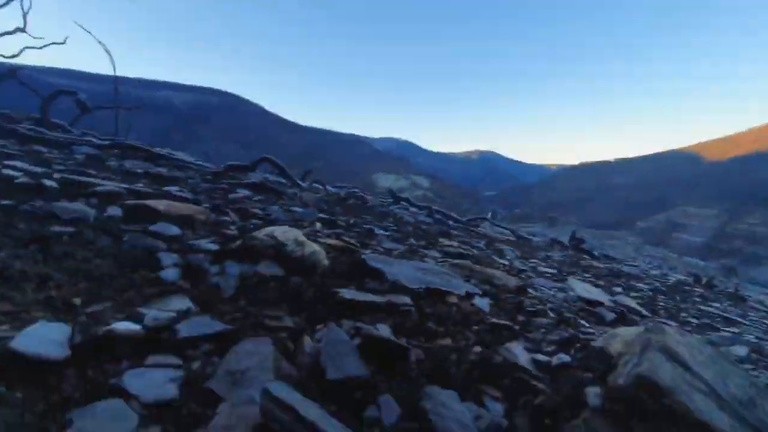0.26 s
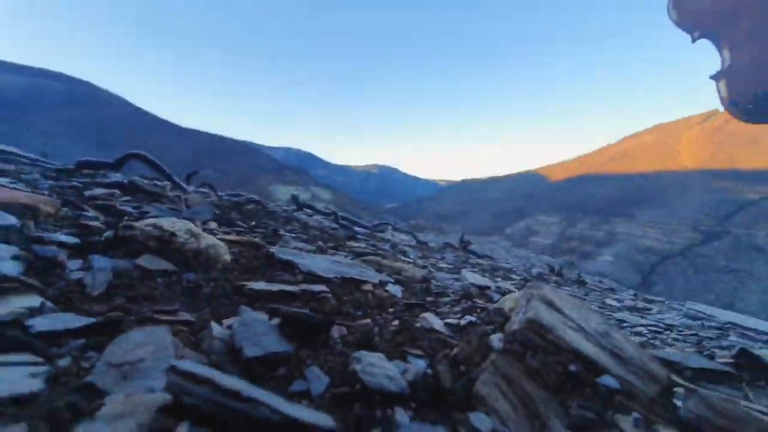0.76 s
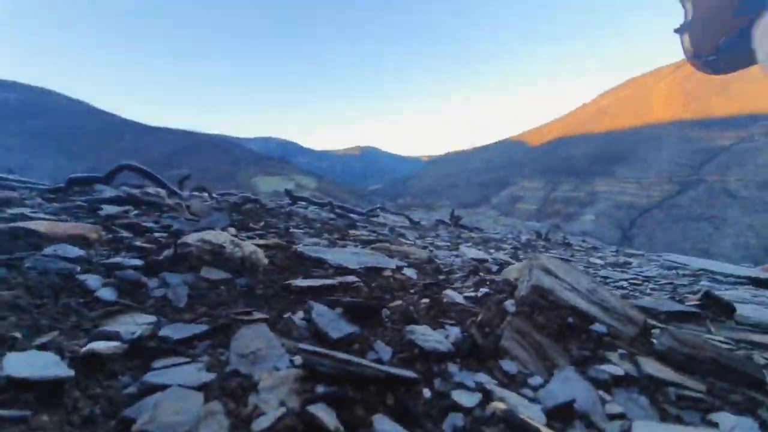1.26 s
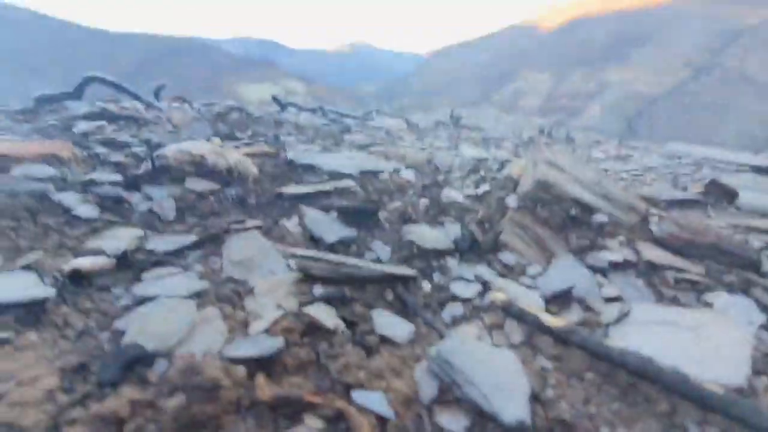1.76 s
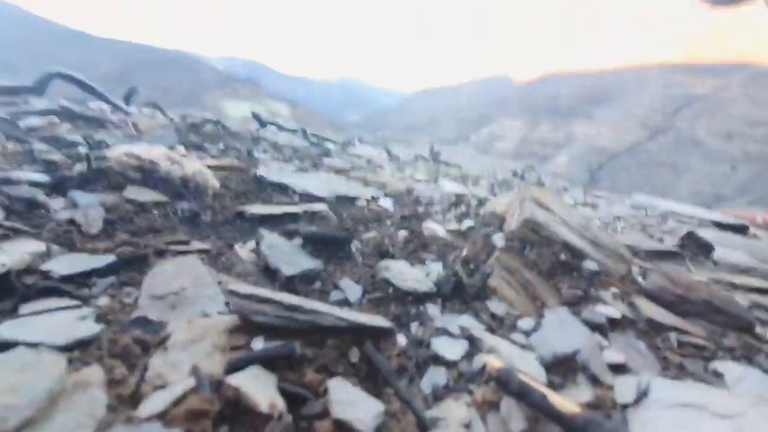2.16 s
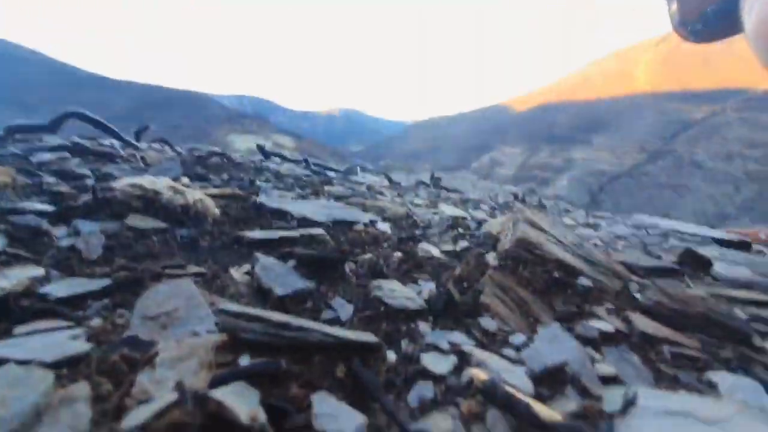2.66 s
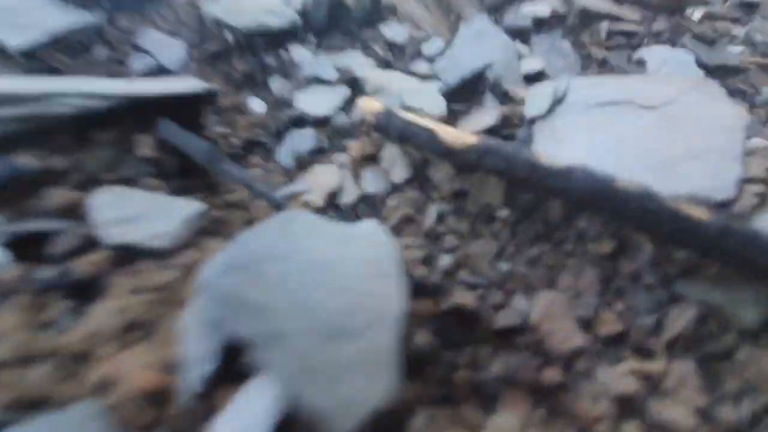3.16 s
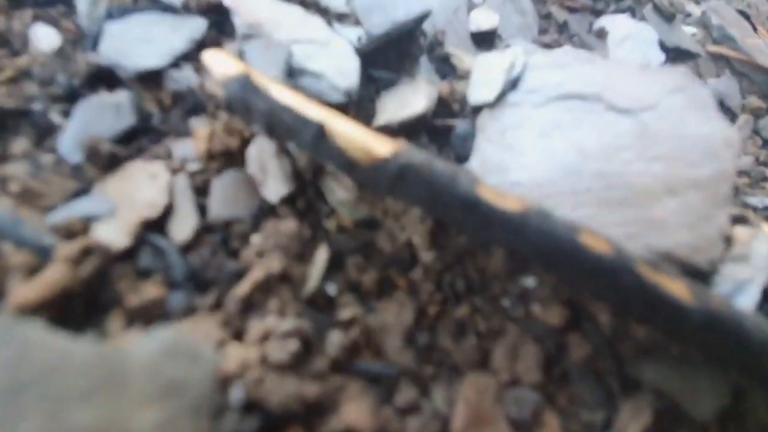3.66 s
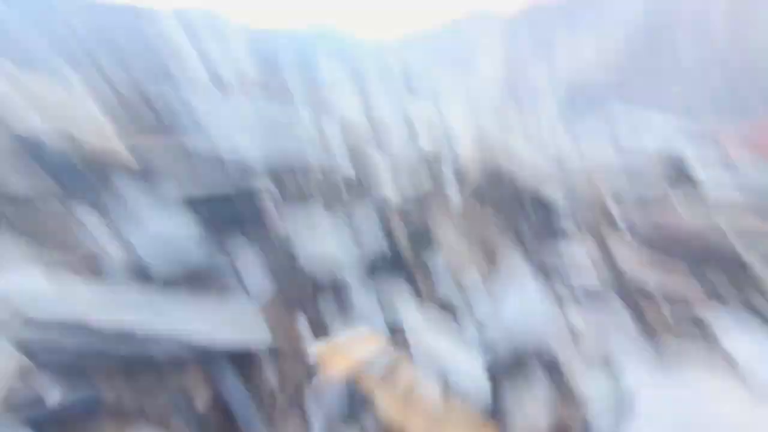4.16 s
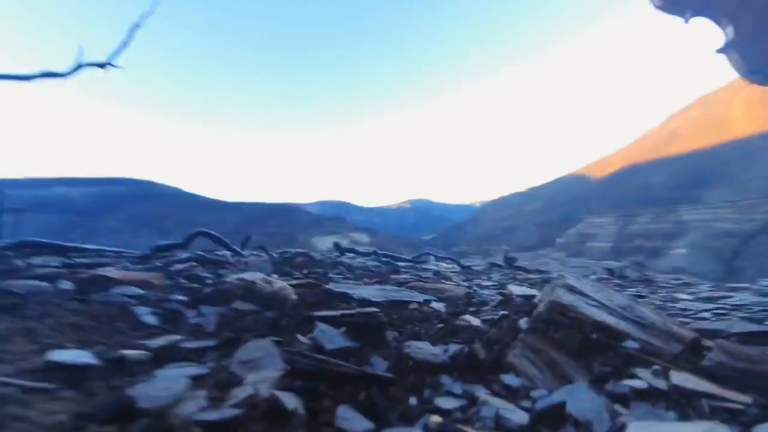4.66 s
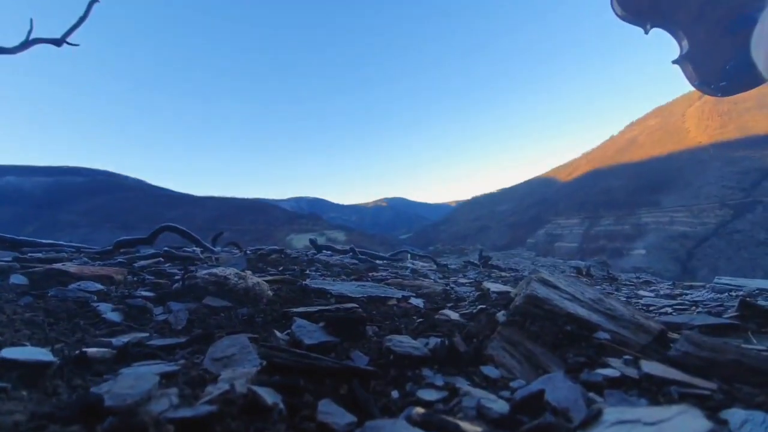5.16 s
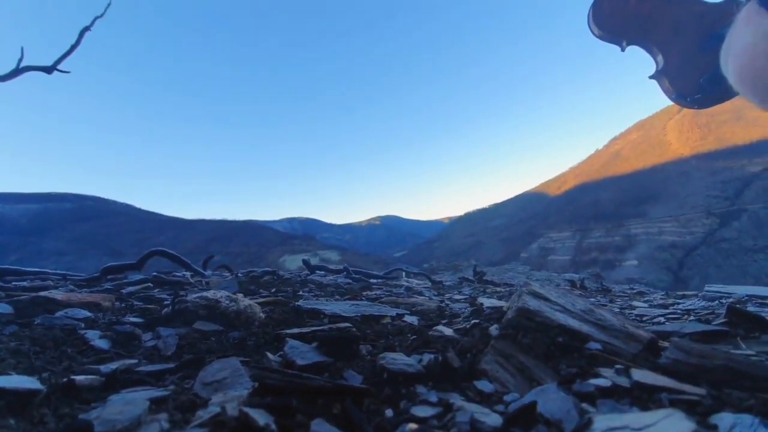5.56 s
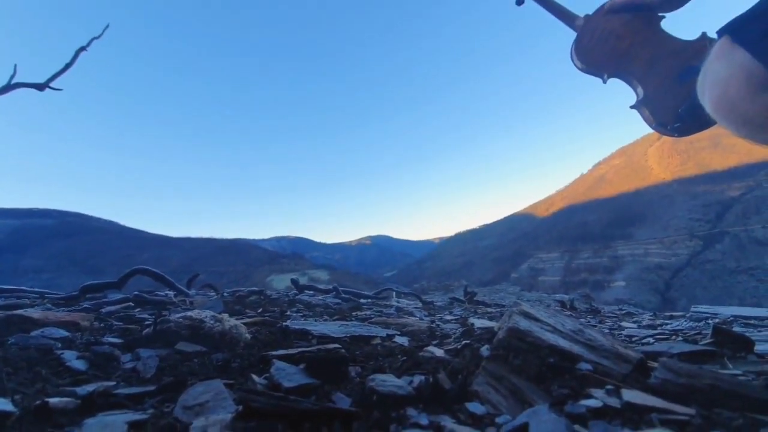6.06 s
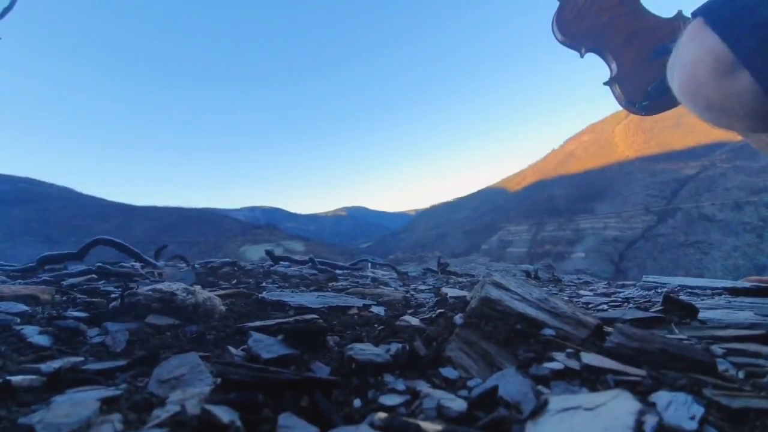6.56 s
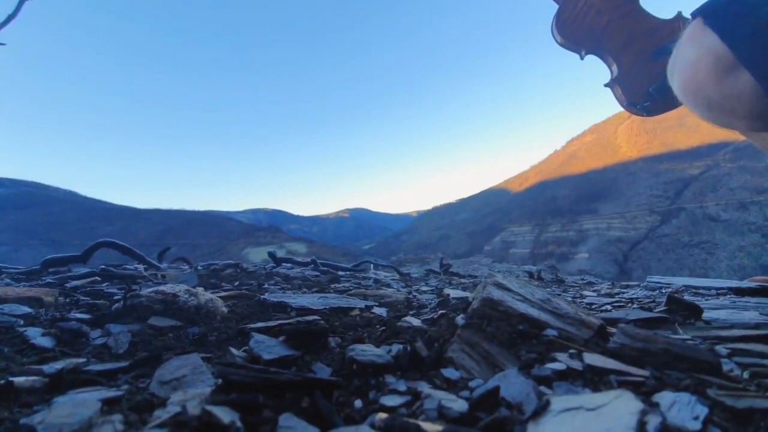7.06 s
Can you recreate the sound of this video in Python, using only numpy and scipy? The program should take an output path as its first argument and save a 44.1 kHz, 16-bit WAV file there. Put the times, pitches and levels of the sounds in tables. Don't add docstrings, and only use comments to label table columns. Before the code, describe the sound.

Quiet, low valley air and slight hiss run throughout, without echo. Fingers barely scuff the housing until a knock and deep thump at 0.5 s, with a creaking grip. Brief rubs follow at 0.85, a double-sided knock at 1.05, then slow scrapes, taps and small shard ticks to 1.6. From 2.0 to 2.2 a hard gritty jam ends in a loud bright crack and shell knock. Softer pushes and rasps lead to rubs and knocks at 3.0, then a sharp slate click and thump at 3.3. It eases near 3.9; scrapes and taps return at 4.2, with hard clicks and blows at 4.6 to 4.8. After sparse scuffs and a 5.4 bump, the hardest paired knocks hit at 5.9. A squeaky scrape and taps come at 6.35, a dull thump at 6.77, then faint scuffs and ticks fade away by 7.2. Left sounds brighter, right duller.

```python
import sys
import numpy as np
from scipy import signal
from scipy.fft import rfft, irfft, next_fast_len
from scipy.io import wavfile
from scipy.ndimage import uniform_filter1d

SR = 44100
rng = np.random.default_rng(int(sys.argv[2]) if len(sys.argv) > 2 else 0)


def boost(x):
    u = np.asarray(x, float) / 20
    return 10 ** u


def to_wav(sig):
    pcm = np.clip(np.atleast_2d(sig), -1, 1) * 32767
    pcm = np.round(pcm).astype(np.int16)
    wavfile.write(sys.argv[1], SR, pcm.T)


N = 322371
PORT_LAG_S = 0.00064
STEP = 32
LEAD = 64

# pitch_hz, level_db (per Hz)
AIR_COLOUR = [(15, -36), (25, -1), (80, -4), (470, -10.5), (1060, -23), (4480, -28), (4990, -33),
              (7110, -43.5), (8140, -37), (14800, -33), (16500, -46.5)]
# pitch_hz, likeness (0 to 1)
AIR_LIKENESS = [(330, 0.55), (1100, 0.0082)]

# pitch_hz, left_db, right_db (per Hz)
SCRAPE_COLOUR = [(475, -34.5, -27), (900, -14, -3.5), (1370, -9, -3.5), (1630, -8, 0.5), (2030, -2, 1.5),
                 (2726, -9, -7), (3350, -11, -7.5), (4200, -11, -10), (5400, -13, -24), (5730, -10.5, -18),
                 (6600, -18.5, -23.5), (8350, -50.5, -46)]
GRIT_COLOUR = [(5560, -30.5, -29.5), (7900, -2.5, -2.5), (8400, -2.6, -2), (11300, -7.5, 3.5),
               (13100, -11, -4), (15300, -17.5, -10), (15900, -21, -17), (16400, -57.5, -61.5)]
# start_s, left_db, right_db, grit_over_scrape_db
SCUFFS = [(0.14, -76, -63, -27), (0.527, -87, -66, 6), (1.115, -41, -45, -6), (1.605, -52, -53.5, -4.5),
          (1.822, -57.5, -74, -9), (2.485, -55, -65, -5), (3.22, -50, -45, -16.5), (3.385, -46, -46, -4.5),
          (3.47, -42.5, -42, -19), (3.55, -51.5, -46.5, -1), (3.87, -68, -65, -5), (1.686, -43, -40, -11.5),
          (1.876, -62, -66, -9), (1.99, -55, -48, -6), (2.02, -44, -44, -14), (2.298, -58, -69, -12),
          (2.568, -62, -52, -4.5), (2.93, -42, -39, -11.5), (3.59, -41.5, -35, -15),
          (3.696, -40.5, -46.5, -14.5), (3.789, -45, -37, -14.5), (4.64, -55, -52, -22),
          (5.087, -74, -71, -13), (5.41, -42, -35, -9.5), (5.625, -53, -42, -12),
          (5.709, -36.5, -35.5, -12.5), (5.368, -65, -78, 2), (6.786, -47.5, -42, -9),
          (7.06, -66, -59, -32), (7.186, -66, -60, -40.5)]
# start_s, length_s, left_db, right_db, grit_over_scrape_db
PUSHES = [
    (.66, 0.22, -40, -40.5, -19),
    (1.27, 0.3, -44, -39, -14),
    (2.38, 0.08, -53, -47, -10.5),
    (2.7, 0.14, -50.5, -54, -11),
    (2.97, 0.11, -41.5, -37.5, -15),
    (3.25, 0.05, -33.5, -40.5, -14),
    (3.97, 0.16, -57, -53.5, -7.5),
    (4.18, 0.084, -39, -41, -16.5),
    (6.25, 0.083, -51, -51, -12),
    (6.066, .022, -51, -59, -4),
]
JAMS = [
    (2.035, 0.11, -25, -33, -13),
    (4.722, 0.024, -38, -35.5, -14.5),
]
SLIDES = [(4.46, 0.16, -74, -59, -21), (4.86, 0.15, -63, -62, -7), (6.545, 0.049, -52.5, -49, -8),
          (6.87, 0.39, -82, -82.5, -19), (1.74, 0.15, -68.5, -71, -9), (3.83, 0.1, -63, -69, -3),
          (5.78, 0.071, -68.5, -67.5, -5), (6.12, 0.14, -72, -78, -4.5), (6.35, 0.087, -34, -30, -12.5),
          (5.1, .09, -79, -75, -12), (5.887, .02, -62, -66, -14), (6.01, .04, -74, -68, -12),
          (3.13, .04, -58, -56, -14)]
SLIPS = [
    (.425, 0.27, -59, -52.5, -18),
    (.68, 0.042, -43.5, -43, -18.5),
    (2.18, .09, -53, -53.5, -7),
    (3.32, 0.13, -40.5, -40, -10),
    (4.285, 0.076, -42.5, -37.5, -14),
    (5.45, 0.1, -52.5, -52, -16.5),
    (5.945, 0.035, -46.5, -45, -15),
    (6.715, 0.061, -53, -46.5, -9.5),
]
GRABS = [
    (4.788, 0.026, -42, -47, -5),
    (5.913, 0.036, -41.5, -53, -17),
    (1.056, .13, -46, -49, -12.5),
    (2.679, 0.13, -49.5, -42.5, -13),
    (5.193, 0.11, -67, -62.5, -10),
]

# pitch_hz, level_db (per Hz)
CREAK_COLOUR = [(90, -28.5), (170, -1.5), (350, -5), (600, -2.5), (760, -6), (1200, -16), (2600, -50)]
SWAY_COLOUR = [(20, -35), (45, 0), (70, 1.7), (100, 0), (160, -8), (420, -75)]
# start_s, left_db, right_db, tighten_db_per_s, slacken_db_per_s
SQUEEZES = [(.529, -58, -49, 147, 170), (.874, -65, -50, 120, 296), (1.12, -48, -41, 330, 186.5),
            (2.176, -43.5, -38.5, 86, 352.5), (2.71, -65, -51.5, 402, 150), (3.063, -58.5, -47.5, 67, 150),
            (3.374, -43, -32.5, 89, 229), (3.582, -62.5, -46, 245, 109.5), (4.277, -43.5, -34, 142, 128),
            (4.582, -55, -52, 245, 200), (4.745, -51.5, -47.5, 102, 70), (5.41, -73, -53, 145, 180),
            (5.695, -56.5, -45, 117, 127), (5.935, -34, -52, 415.5, 421), (6.38, -43.5, -30.5, 331, 225.5),
            (6.776, -63, -51, 123, 156)]
# start_s, length_s, left_db, right_db
HOLDS = [
    (0.662, 0.18, -58, -48.5),
    (1.172, 0.59, -62.5, -55),
    (1.95, 0.17, -61.5, -51),
    (2.25, 0.28, -73.5, -61.5),
    (2.69, .15, -69, -58.5),
    (3.678, 0.47, -57.5, -53),
    (5.191, 0.14, -71, -63),
    (6.008, 0.3, -70, -63.5),
    (6.475, 0.11, -66, -57.5),
]

# start_s, left_peak_db, right_peak_db, length_ms
RUBS = [(.43, -50, -44, 25), (.83, -34, -36, 30), (.854, -27, -31, 6), (.875, -26, -32, 6),
        (1.27, -40, -38, 60), (1.42, -34, -34, 40), (2.057, -22, -30, 5), (2.07, -24, -32, 8),
        (2.096, -19, -29, 12), (2.13, -15, -26, 4), (2.9, -35, -31, 4), (3.02, -36, -32, 20),
        (3.262, -27, -34, 10), (3.318, -26, -27, 10), (3.46, -36, -35, 15), (3.58, -33, -30, 15),
        (6.338, -25, -21, 1.5), (6.348, -21, -19, 2), (6.37, -26, -24, 6), (6.44, -30, -28, 6),
        (7.05, -56, -52, 25), (7.17, -56, -52, 30), (6.07, -38, -48, 8), (5.1, -60, -58, 30)]
# start_s, left_peak_db, right_peak_db, length_ms
CATCHES = [(1.4019, -28.5, -35, 2), (1.5494, -30.5, -25, 4.3), (2.9767, -22.5, -22, 2.5),
           (3.0625, -40, -24, 1.1), (3.2081, -32, -28.5, 1.7), (3.2178, -31, -32.5, 3.8),
           (4.2595, -23.5, -26.5, 2.1), (4.29, -43, -27, 5.4), (5.194, -38.5, -43.5, 1.9),
           (5.4122, -24, -21, 1.2), (5.9057, -33, -33, 1.2), (5.937, -24, -25.5, 0.77),
           (6.3534, -22, -20, 2.6), (6.3949, -30, -11, 1.1), (7.023, -51.5, -50, 1.5)]

# start_s, left_peak_db, right_peak_db, swing_hz
ROCKS = [
    (.5197, -16.5, -25, 140),
    (.5225, -45, -19, 105),
    (1.0553, -25, -45, 600),
    (1.0559, -45, -25, 740),
    (2.159, -8, -9, 900),
    (3.6325, -46, -41, 370),
    (4.7443, -30, -14, 560),
    (5.9141, -6.5, -15.5, 270),
    (5.9361, -9, -17, 280),
    (5.9505, -14.5, -24.5, 270),
]
# start_s, left_peak_db, right_peak_db, swing_hz
KNOCKS = [(2.1598, -11, 0, 420), (2.1773, -19.5, -14, 270), (2.9768, -20, -12.5, 336),
          (3.3039, -31, -22.5, 300), (3.3566, -26, -15, 680), (4.2791, -39, -33.5, 430),
          (4.7432, -9, -16, 792), (4.7901, -25.5, -21, 421), (6.2634, -43, -40, 294),
          (6.3397, -39, -26, 387), (5.752, -38, -40, 150)]
# pitch_hz, width_hz, level_db
SHELL_RINGS = [(310, 110, -6), (760, 180, -1)]

# start_s, left_peak_db, pitch_hz, length_ms
NEAR_TICKS = [(0.52, -18, 2810, 3.3), (1.0572, -36, 2770, 1.9), (1.3805, -19, 3560, 2.4),
              (2.1622, -3, 4300, 1.8), (2.2865, -30.5, 4710, 1.8), (2.3084, -34.5, 4730, 1.6),
              (3.3584, -1.5, 4420, 3.5), (4.5679, -29, 2240, 5.2), (4.7139, -23, 3100, 1.8),
              (4.7385, -5, 3300, .9), (4.7445, -6.5, 3400, 2.3), (4.79, -18, 4275, 2.7),
              (4.811, -22.5, 4350, 1.9), (4.8587, -35, 3370, 1.5), (5.8863, -29.5, 3170, 1),
              (6.247, -37.5, 4100, 0.67), (7.112, -54, 4200, .84)]
# start_s, left_peak_db, right_peak_db, pitch_hz, length_ms
RASPS = [(1.093, -27, -40, 4600, 35), (2.14, -16, -32, 5000, 12), (.75, -36, -44, 5000, 20),
         (1.53, -32, -38, 4500, 25), (2.715, -38, -36, 3800, 30), (2.8, -38, -42, 5000, 30),
         (4.798, -24, -36, 4500, 12), (5.918, -32, -40, 3000, 14), (5.939, -30, -38, 2500, 10),
         (5.9507, -26, -36, 2800, 2), (5.962, -38, -48, 4000, 2), (4.729, -28, -36, 2500, 3),
         (4.609, -46, -56, 5500, 3), (4.766, -40, -52, 4500, 6), (2.2205, -32, -42, 4000, 2),
         (2.858, -40, -42, 4000, 1.5), (2.943, -36, -40, 4500, 2), (3.149, -38, -37, 2500, 2),
         (1.283, -42, -52, 5500, 2), (5.366, -40, -40, 4500, 2), (6.891, -52, -58, 6500, 1),
         (4.896, -44, -46, 3500, 1.5), (4.933, -45, -41, 2200, 3), (3.872, -46, -50, 6500, 1),
         (6.353, -26, -28, 4500, 4), (5.516, -50, -47, 2200, 3), (5.712, -36, -34, 4500, 2),
         (3.3545, -22, -26, 2500, 3)]
# start_s, left_peak_db, right_peak_db, pitch_hz, length_ms
TICKS = [
    (1.987, -20.5, -13.5, 3420, 1.4),
    (1.9931, -29, -26, 7450, 2.3),
    (2.0433, -17, -14, 2482, 2.7),
    (2.4465, -27, -41.5, 5600, 2.6),
    (3.286, -17, -31.5, 2490, 2.7),
    (4.591, -10, -18, 2200, 1.6),
    (5.3135, -29.5, -51, 6300, 0.86),
    (5.9143, -17.5, -32, 3190, 1.4),
]

# start_s, left_peak_db, right_peak_db, ring_hz
THUMPS = [(0.5202, -25, -24, 70), (0.8745, -48, -36.5, 81), (1.5621, -44, -22, 62),
          (1.6286, -51.0, -30.5, 69), (2.1572, -17.5, -29.5, 89.5), (2.9872, -31, -28.5, 69.5),
          (3.0629, -36, -19.5, 87), (3.299, -34, -32, 112), (3.356, -14, -20, 88.5),
          (3.945, -43, -35, 78.5), (4.291, -28, -20.5, 66.6), (4.57, -42, -23, 100),
          (4.5915, -35, -18, 116.6), (4.7377, -22.5, -26.5, 78.5), (4.985, -50.5, -42, 65),
          (5.4118, -40, -43, 59.7), (5.9107, -20.5, -36, 96.5), (6.7738, -27.5, -31.5, 73.6),
          (6.99, -47, -54, 74)]

# start_s, right_peak_db, swing_hz
PLUCKS = [(4.2393, -24, 516), (3.3853, -19, 260), (4.5905, -10.5, 330), (4.3073, -27, 560),
          (4.5157, -33, 490), (4.5682, -22.5, 278), (4.6405, -25, 450), (4.9616, -37, 400),
          (6.0077, -37, 587), (6.3938, -12, 700), (.709, -33, 200), (6.426, -27, 600)]
# start_s, right_peak_db, swing_hz
TAPS = [(0.8722, -28, 674), (1.5489, -21.5, 740), (1.5615, -27.5, 338), (2.6785, -34.5, 473),
        (2.683, -34, 600), (2.9227, -29.5, 650), (3.0606, -33, 288), (3.5363, -30.5, 335),
        (4.2573, -20, 630), (4.2902, -20, 750), (3.262, -32, 350), (5.4115, -23.5, 900), (5.9057, -28, 500)]


def unit(x):
    return x / np.sqrt(np.mean(x ** 2, axis=-1, keepdims=True) + 1e-20)


def peaked(x):
    return x / np.abs(x).max(axis=-1, keepdims=True)


def ports(left_db, right_db):
    return boost([[left_db], [right_db]])


def along(points, hz):
    f, *columns = np.transpose(points)
    return np.array([np.interp(np.log(hz + 1), np.log(f + 1), column) for column in columns])


def wobble(rate):
    knots = rng.standard_normal((2, int(N * rate / SR) + 2))
    place = np.arange(N) * rate / SR
    return np.array([np.interp(place, np.arange(len(k)), k) for k in knots])


def filtered(x, response):
    size = next_fast_len(N + 8192)
    return irfft(rfft(x, size) * response(np.fft.rfftfreq(size, 1 / SR)), size)[..., :N]


def add(out, start_s, sound):
    out[:, round(start_s * SR):][:, :sound.shape[1]] += sound


def air():
    def mid_and_side(hz):
        turn = np.arccos(np.clip(along(AIR_LIKENESS, hz)[0], -1, 1)) / 2
        return boost(along(AIR_COLOUR, hz)) * [np.cos(turn), np.sin(turn)]

    mid, side = filtered(rng.standard_normal((2, N)), mid_and_side)
    level_db = -70.5 + 1.1 * wobble(1)[0]
    return boost(level_db) * unit(np.array([mid + side, mid - side]))


def friction(colour, catch_db, grain_db, per_s):
    size_db = grain_db + 3.1 * np.minimum(rng.exponential(size=N), 2)
    grains = (rng.random(N) < per_s / SR) * boost(size_db)
    grains = [np.roll(grains, round(PORT_LAG_S * SR)), grains]
    rough = boost(catch_db) * (rng.standard_normal((2, N)) + grains)
    return unit(filtered(rough, lambda hz: boost(along(colour, hz))))


def patchy(x, depth_db):
    z = signal.stft(x, nperseg=256)[2]
    field = uniform_filter1d(rng.standard_normal(z.shape), size=5, axis=1)
    field = uniform_filter1d(field, size=18, axis=2)
    return unit(signal.istft(z * boost(depth_db * field / field.std()), nperseg=256)[1][:, :N])


def contact(start_s, length_s, climb_db, press, let_go):
    t = np.arange(N // STEP + 1) * STEP / SR - start_s
    length_s = length_s + 1e-9
    held_db = climb_db * np.clip(t / length_s, 0, 1) - max(climb_db, 0)
    before, after = np.maximum(-t, 0), np.maximum(t - length_s, 0)
    quicken = 1 + (before + after) / 0.35
    return boost(held_db - (press * before + let_go * after) * quicken)


def control_db(gains):
    return np.repeat(20 * np.log10(gains), STEP, axis=-1)[..., :N]


def strokes():
    scuffs = [(start_s, 0, *rest) for start_s, *rest in SCUFFS]
    # rows, then climb_db, press and let go in dB per s
    kinds = [(scuffs, 0, 396, 540), (PUSHES, 12.1, 190, 380), (JAMS, 16, 214, 1400),
             (SLIDES, -7, 850, 270), (SLIPS, -15.5, 1100, 240), (GRABS, 0, 8600, 660)]
    gains = boost(-105)
    for rows, *kind in kinds:
        for start_s, length_s, left_db, right_db, grit_db in rows:
            levels = np.array([ports(left_db, right_db), ports(left_db + grit_db, right_db + grit_db)])
            gains = gains + levels * contact(start_s, length_s, *kind)
    return control_db(gains)


def dragging():
    scrape_db, grit_db = strokes()
    catch = 0.45 * wobble(28)[0] + 0.82 * wobble(70) + 1.15 * wobble(250)
    scrape = patchy(friction(SCRAPE_COLOUR, 2.87 * catch, grain_db=14.5, per_s=260), depth_db=3.0)
    grit = boost(1.8 * wobble(17)) * friction(GRIT_COLOUR, 3.3 * catch, grain_db=10.5, per_s=30)
    upper = filtered(scrape, lambda hz: 1 / (1 + (3300 / (hz + 1)) ** 4))
    bright_db = np.clip(0.74 * (grit_db - scrape_db + 14.5), -14, 6)
    scrape = scrape + (boost(bright_db) - 1) * upper
    return boost(scrape_db + 1.46) * scrape + boost(grit_db + 0.24) * grit


def squeezes():
    gains = ports(-81, -75.5)
    for start_s, left_db, right_db, tighten, slacken in SQUEEZES:
        gains = gains + ports(left_db, right_db) * contact(start_s, 0, 0, tighten, slacken)
    for start_s, length_s, left_db, right_db in HOLDS:
        hold = contact(start_s, length_s, climb_db=-2.5, press=350, let_go=210)
        gains = gains + ports(left_db, right_db) * hold
    return control_db(gains)


def grip():
    creak_db = squeezes()
    lumps_db = 4.2 * wobble(50) + 2.5 * wobble(11)
    sway_db = 0.74 * creak_db.max(axis=0) - 11.0 + np.array([[-4], [0]])
    creak = boost(creak_db + 3.4) * friction(CREAK_COLOUR, lumps_db, grain_db=21, per_s=41)
    sway = boost(sway_db) * friction(SWAY_COLOUR, 5.7 * wobble(26), grain_db=11.5, per_s=12)
    return creak + sway


def bursts(rows, spread, spit_db):
    out = np.zeros((2, N + SR))
    t = np.arange(-LEAD, 8192 - LEAD) / SR
    hz = np.fft.rfftfreq(len(t), 1 / SR)
    spit = boost(spit_db) * (hz > 5000) * (hz < 16000)
    for start_s, left_db, right_db, pitch_hz, length_ms in rows:
        u = np.maximum(t, 0) / (length_ms * 0.00039)
        burst = u * np.exp(-u) * rng.standard_normal((2, len(t)))
        hump = np.exp(-(np.log((hz + 1) / pitch_hz) / spread) ** 2)
        colour = hump * np.sqrt(pitch_hz / (hz + 1)) + spit
        sound = irfft(rfft(burst) * colour, len(t))[:, :-4 * LEAD]
        add(out, start_s - 0.0006 - LEAD / SR, ports(left_db, right_db) * peaked(sound))
    return out[:, :N]


def cavity_rings():
    rows = [(start_s, left_db, right_db, 1940, length_ms)
            for start_s, left_db, right_db, length_ms in CATCHES + RUBS]
    return bursts(rows, spread=0.3, spit_db=-30)


def blows(events, cycles, rise, drop, turn, gain_db, lag_s=PORT_LAG_S, right=1):
    out = np.zeros((2, N + SR))
    t = np.arange(SR // 6) / SR
    late = np.maximum(t - [[lag_s], [0]], 0)
    for start_s, left_db, right_db, swing_hz in events:
        turns = swing_hz * late
        swing = -np.sin(2 * np.pi * turns ** drop + [[turn], [0]])
        fade = boost(-60 * turns / cycles)
        swing = swing * fade * (1 - np.exp(-turns / rise))
        add(out, start_s, ports(left_db + gain_db, right_db + gain_db) * peaked(swing) * [[1], [right]])
    return out[:, :N]


def through_shell(x, soft_hz):
    def response(hz):
        ring = sum(boost(db) * 1j * hz * width / (pitch ** 2 - hz ** 2 + 1j * hz * width)
                   for pitch, width, db in SHELL_RINGS)
        return np.array([np.ones_like(ring), 1 + ring]) / (1 + 1j * hz / soft_hz) ** 2

    return filtered(x, response)


def knocks():
    rocks = blows(ROCKS, cycles=4.6, rise=0.13, drop=0.7, turn=0.3, gain_db=1.5, lag_s=0.0001, right=-1)
    straight = blows(KNOCKS, cycles=4.6, rise=0.064, drop=0.72, turn=0.45, gain_db=1.5)
    return through_shell(rocks + straight, soft_hz=4800)


def slate_ticks():
    near = [(start_s, db, db - 16.5, pitch_hz, length_ms)
            for start_s, db, pitch_hz, length_ms in NEAR_TICKS]
    return bursts(TICKS + near + RASPS, spread=0.68, spit_db=-22.5)


def thumps():
    return blows(THUMPS, cycles=4.5, rise=0.27, drop=0.94, turn=1.9, gain_db=1.5)


def fingertips():
    out = np.zeros((2, N))
    for rows, right in [(PLUCKS, -1), (TAPS, 1)]:
        events = [(start_s, db - 41, db, swing_hz) for start_s, db, swing_hz in rows]
        out += blows(events, cycles=2.2, rise=0.056, drop=0.71, turn=0.58, gain_db=3.5, right=right)
    return through_shell(out, soft_hz=2800)


def scene():
    steady = air() + dragging() + grip()
    return steady + cavity_rings() + knocks() + slate_ticks() + thumps() + fingertips()


def low_pass(x):
    return signal.sosfilt(signal.butter(12, 16820, fs=SR, output="sos"), x)


def record(dry):
    cut = signal.sosfilt(signal.butter(2, 42, "high", fs=SR, output="sos"), dry)
    soft = cut / (1 + np.abs(cut / 0.97) ** 6) ** (1 / 6)
    mix = filtered(soft, lambda hz: hz < 16600)
    return low_pass(mix)


dry = scene()
out = record(dry)
to_wav(out)
```